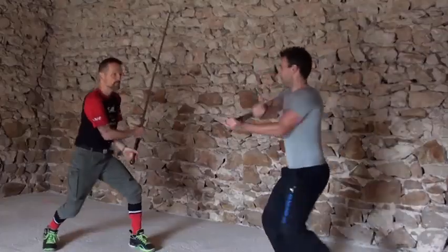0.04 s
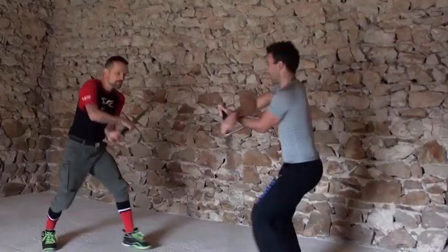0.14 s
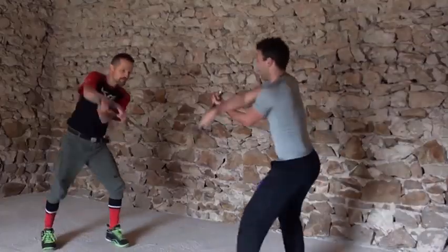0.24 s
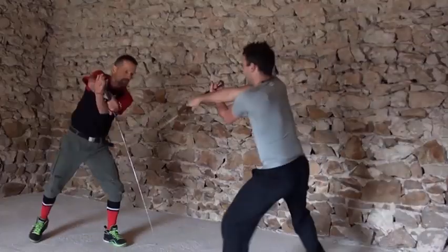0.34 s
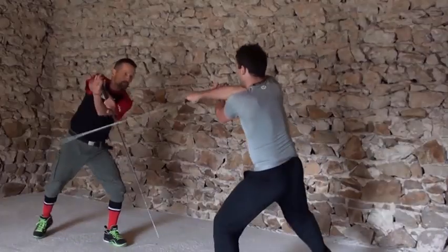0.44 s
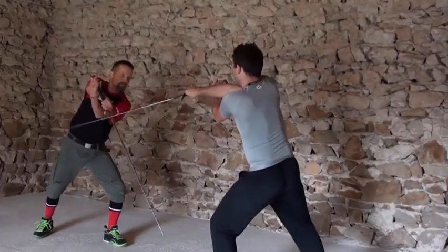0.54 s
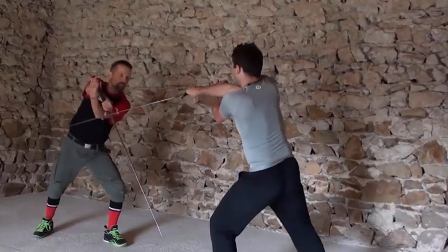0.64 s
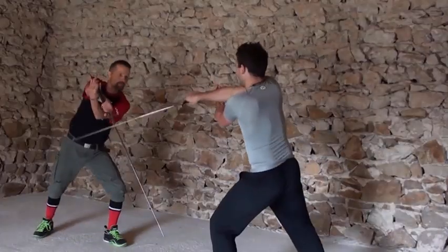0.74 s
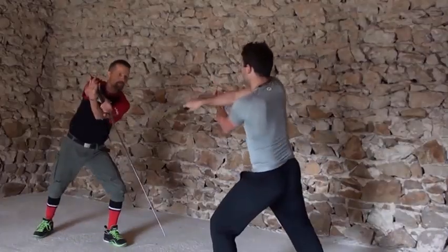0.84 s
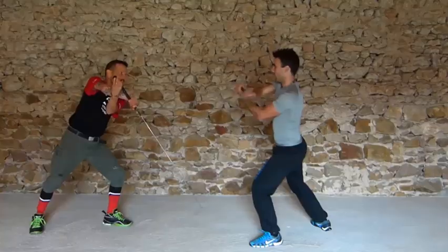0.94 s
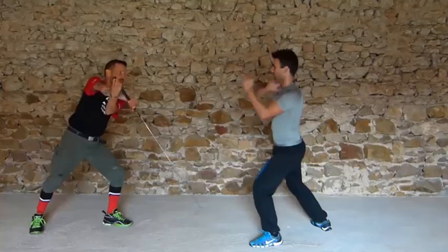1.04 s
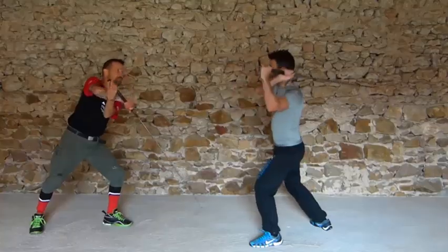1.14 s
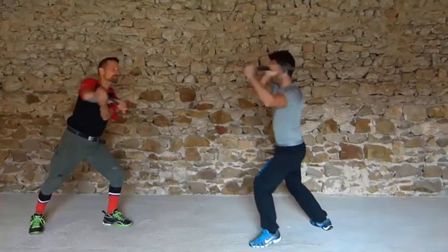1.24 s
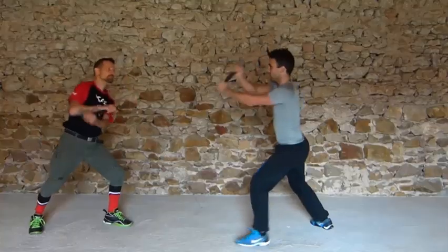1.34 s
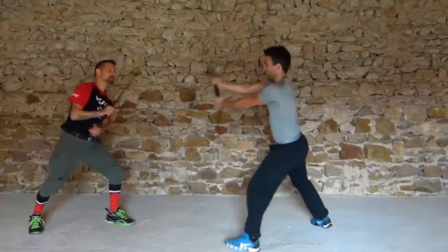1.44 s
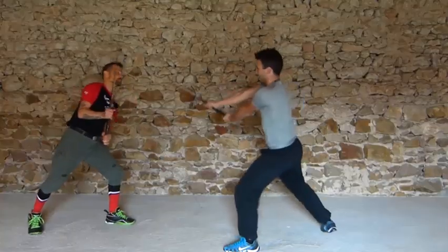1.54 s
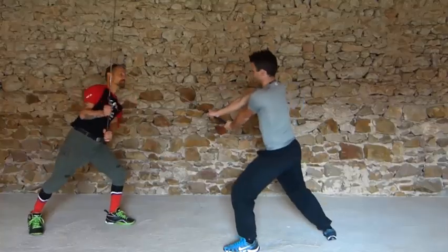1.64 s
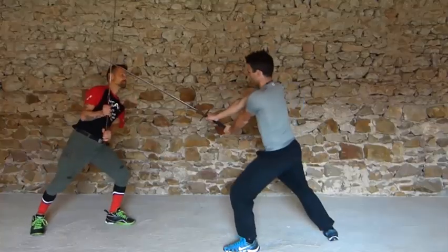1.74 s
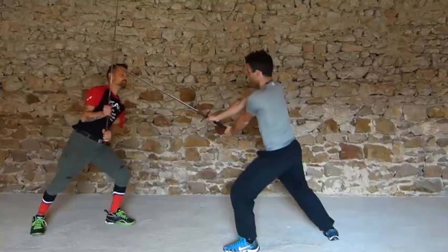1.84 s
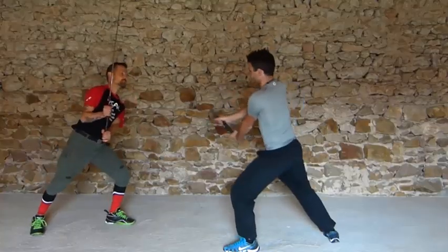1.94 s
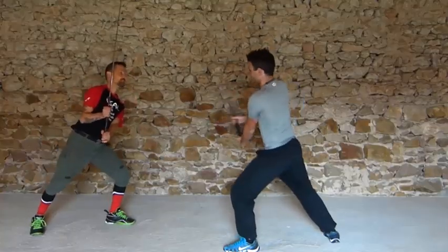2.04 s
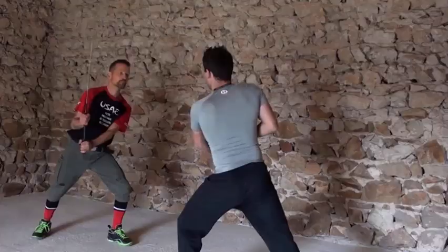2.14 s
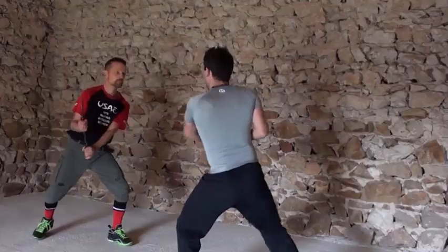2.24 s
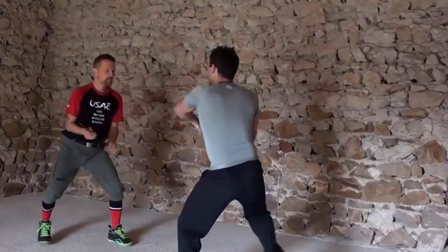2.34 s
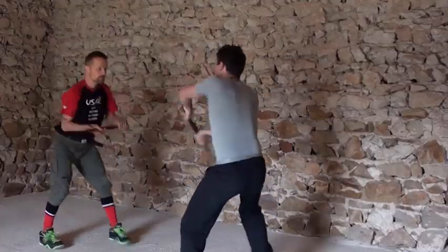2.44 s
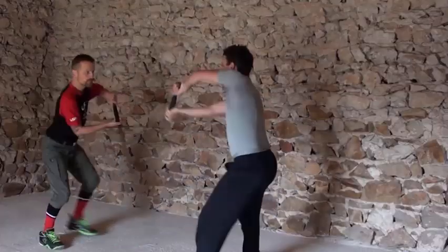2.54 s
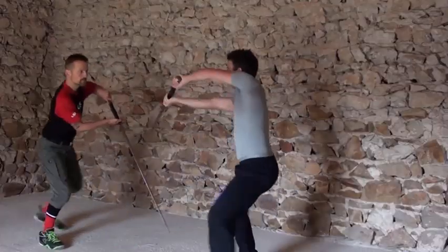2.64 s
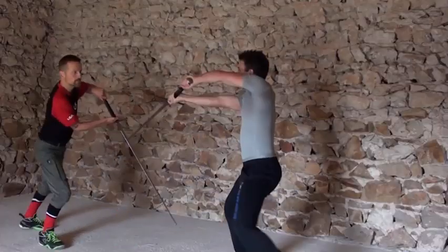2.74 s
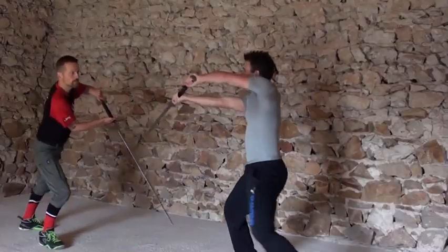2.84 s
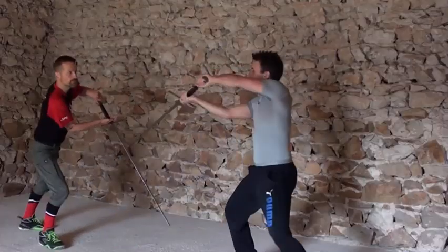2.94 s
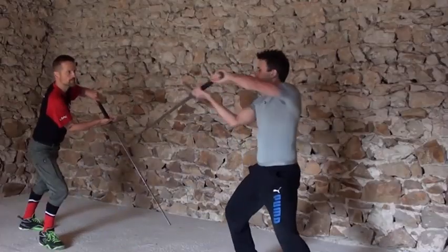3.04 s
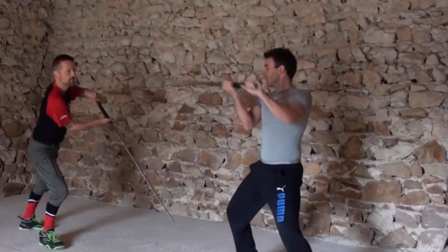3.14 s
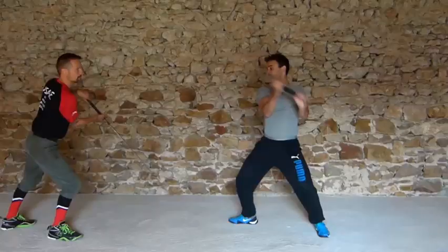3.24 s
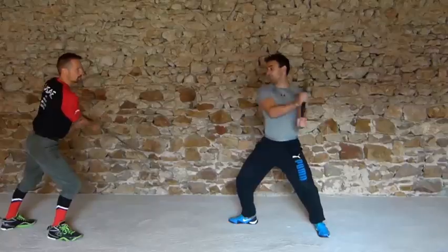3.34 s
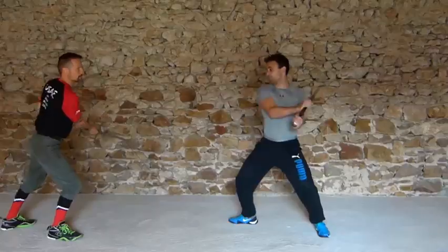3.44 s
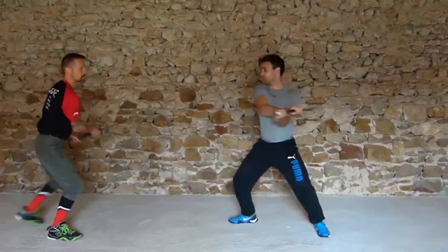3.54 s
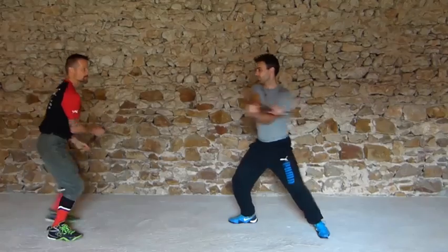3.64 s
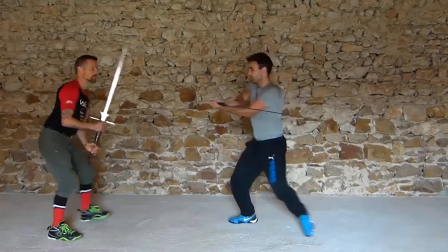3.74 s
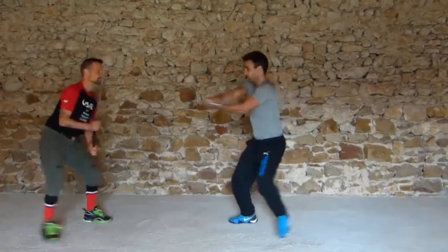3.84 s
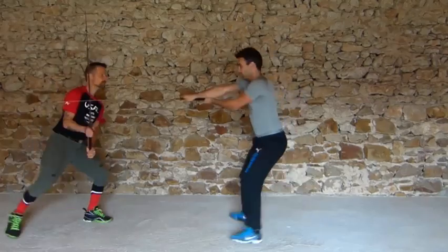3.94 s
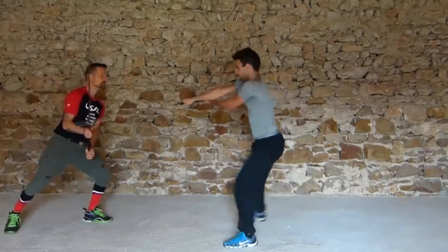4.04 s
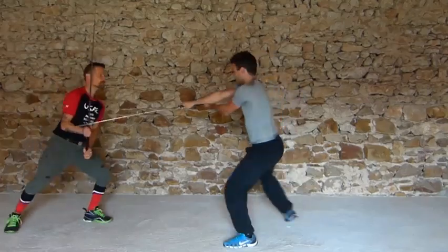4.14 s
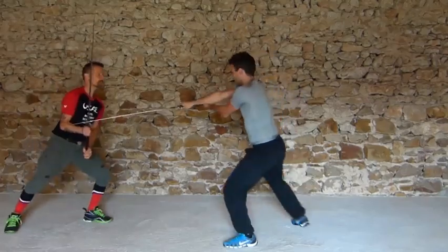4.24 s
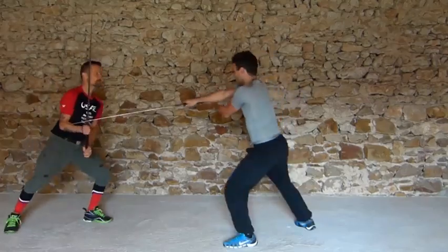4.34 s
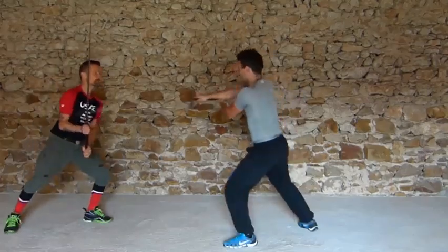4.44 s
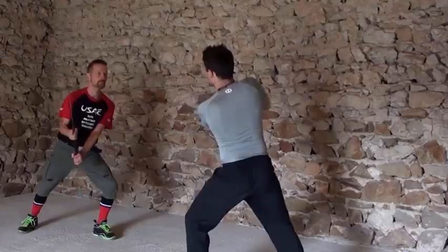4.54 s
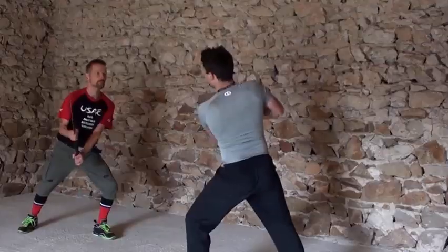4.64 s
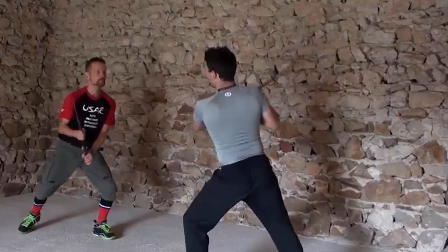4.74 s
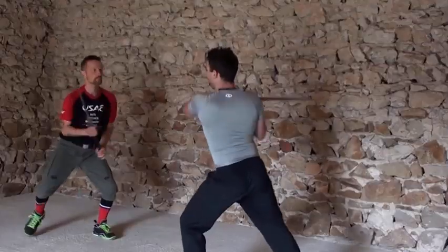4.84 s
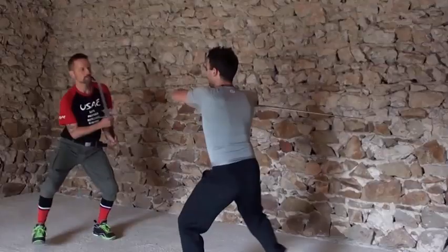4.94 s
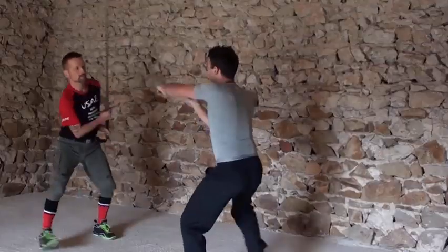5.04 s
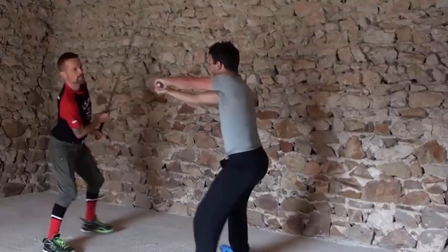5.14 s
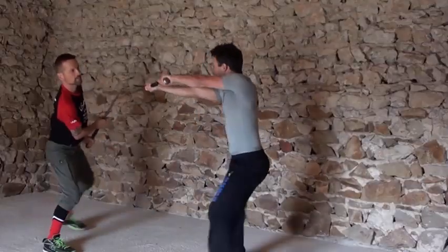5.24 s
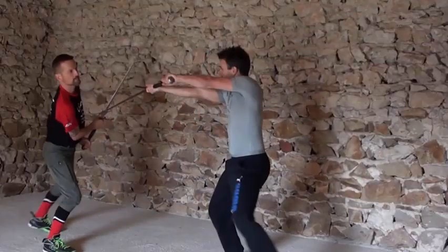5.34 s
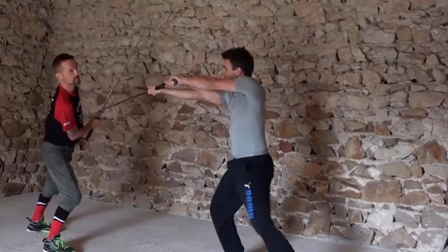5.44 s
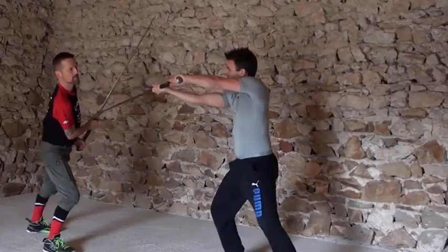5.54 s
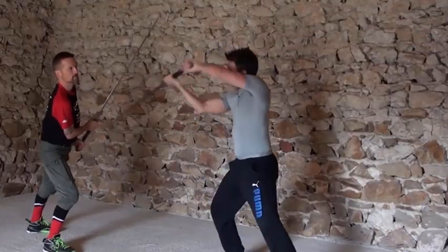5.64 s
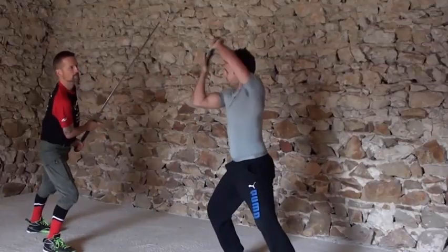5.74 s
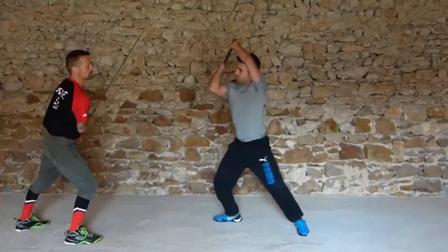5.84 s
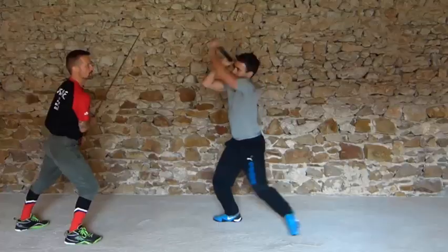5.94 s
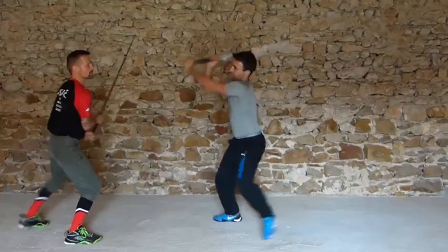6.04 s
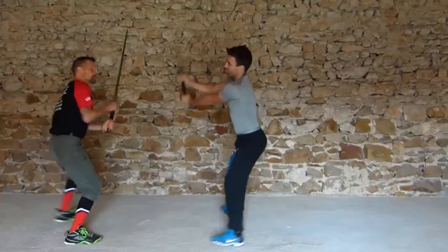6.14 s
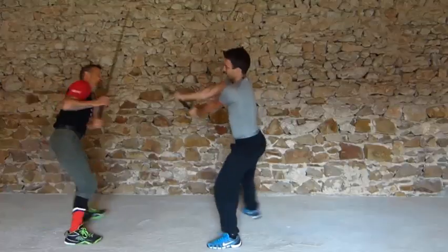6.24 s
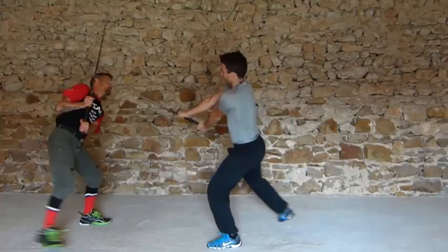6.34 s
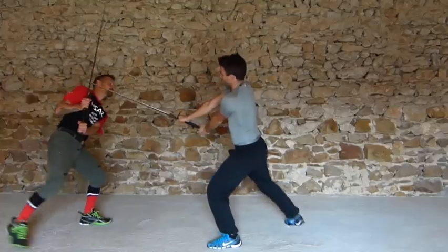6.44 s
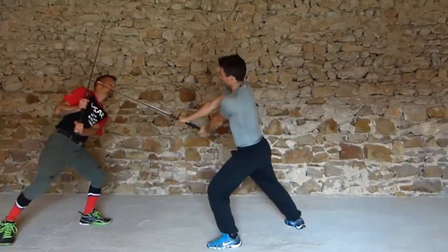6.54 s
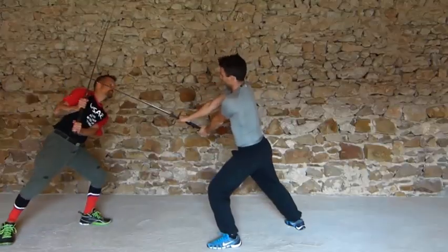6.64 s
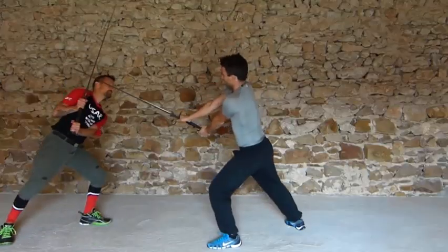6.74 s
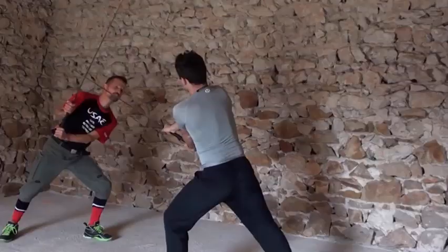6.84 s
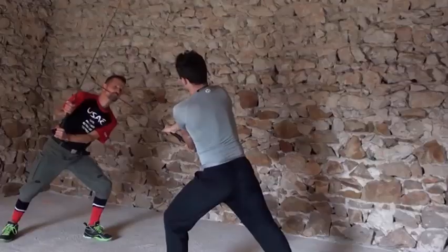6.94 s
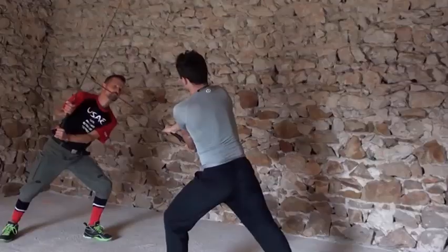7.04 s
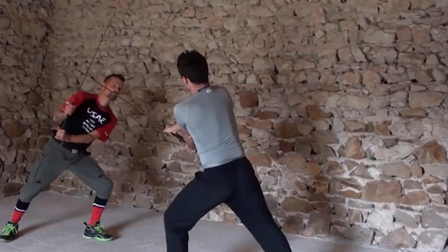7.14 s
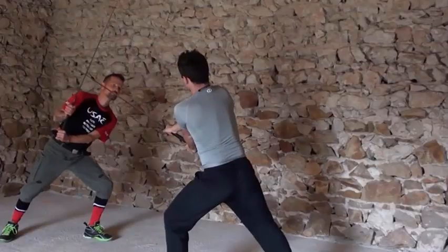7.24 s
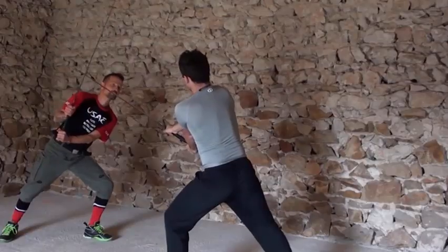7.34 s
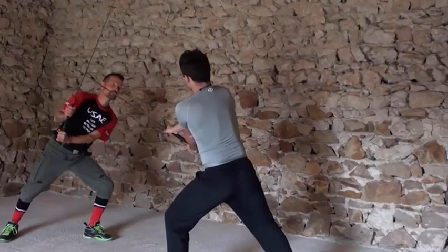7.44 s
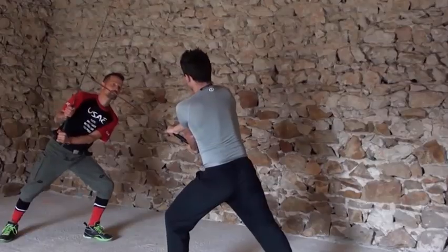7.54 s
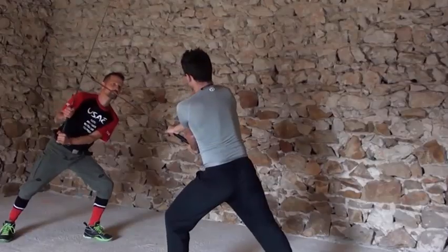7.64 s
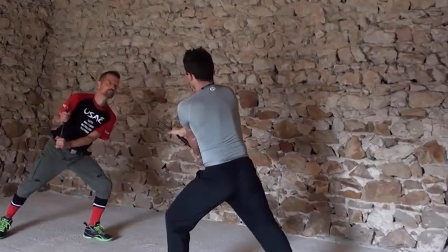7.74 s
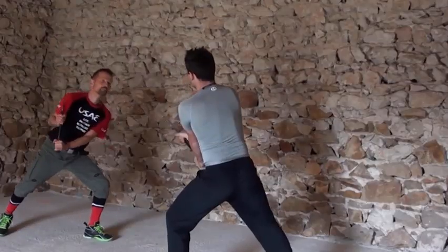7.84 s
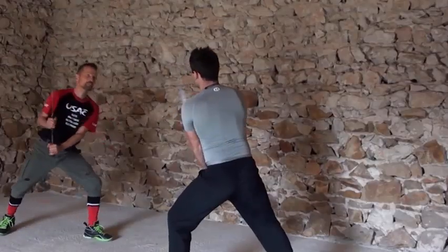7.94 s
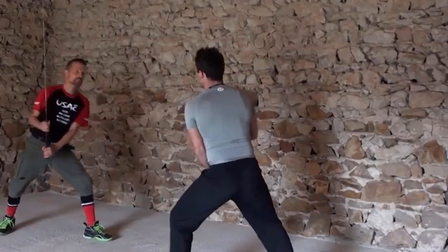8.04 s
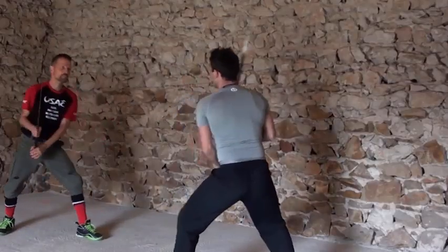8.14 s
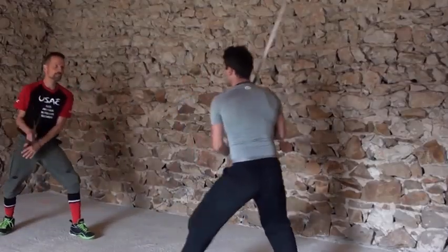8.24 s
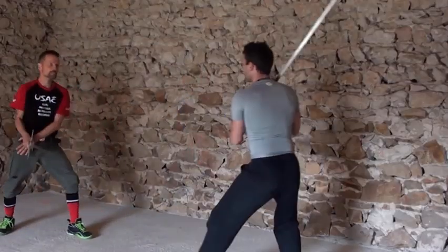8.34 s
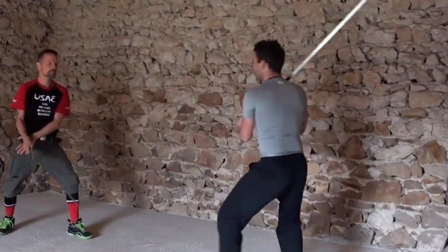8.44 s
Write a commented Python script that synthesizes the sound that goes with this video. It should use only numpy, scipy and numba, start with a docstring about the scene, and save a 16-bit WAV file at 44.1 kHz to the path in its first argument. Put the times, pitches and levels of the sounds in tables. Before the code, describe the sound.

A quiet room hush with short, hard stone-wall echo. A sole slides and stamps at 0.3 s, and at 0.35 s two steel blades crack together very loudly, rebounding at 0.52 s, with a clear high ring around 5 kHz lasting nearly a second. A lighter step leads to a slightly softer clash at 1.5 s and small tick at 1.67 s. Shuffling feet precede a hard, knocking clash at 2.56 s, answered by a strong second clack at 2.76 s. Another pair comes at 3.94 and 4.05 s with a stamp, then a faint touch at 4.37 s. A drier, quickly damped clash lands at 5.22 s, and a bright one at 6.24 s after a sleeve swish. From 6.7 to 7.5 s come only faint scraping ticks, then cloth rustle and a gritty foot slide near 8.1 s, fading into quiet.

```python
"""Steel longswords clash and ring as two fencers drill cuts and parries in a bare stone room.
Each clash is a rattle of filtered noise impacts, followed by decaying tones for the blades and crossguard.
Filtered noise also makes the sliding and stamping feet, the rustling clothes and the quiet background.
The room echoes clacks, feet and clothes; a fast limiter and a slow gain control hold down the peaks."""
import sys
import numpy as np
from scipy import signal
from scipy.fft import rfft, irfft
from scipy.io import wavfile
from numba import njit

SR = 44100
rng = np.random.default_rng(int(sys.argv[2]) if len(sys.argv) > 2 else 0)


def materialize(psi):
    """Save the field psi as 16-bit PCM at rate SR to the path in sys.argv[1].

    A 1-D psi becomes a single channel; in a 2-D psi each row is a channel.
    """
    bounded = np.clip(np.atleast_2d(psi).T, -1, 1)
    quanta = np.round(bounded * 32767).astype(np.int16)
    wavfile.write(sys.argv[1], SR, quanta)


N = 374409

# parried cuts: [start_s, clack_db, rattle_decay_ms, flat_knock_db, ring_damping_db_per_s, first_blade_ring_db,
#                second_blade_ring_db, swing_s, windup_rustle_db, release_swish_db]
PARRIED_CUTS = [ (0.349, 8.5, 5.9, 0.5, -4, 1, -26.5, 0.39, -56.5, -38),
                (1.504, 2.5, 9.7, -3.5, 28, -8, -11.5, 0.31, -50, -42),
                (2.564, 7.5, 6.5, 7.5, 25, 5.5, -23, 0.44, -54, -45.5),
                (3.935, 3, 7.3, -2, 22.5, -4, -29, 0.47, -47.5, -53),
                (5.222, -1, 10, -5, 46.5, -4.5, -6, .35, -59, -45.5),
                (6.244, 6, 6.6, -3.5, 18, -20, -2.5, .42, -59, -37.5)]
# steps, each a slide of the sole and a landing:
# [landing_s, stamp_db, slide_lead_s, slide_length_s, slide_db, slide_tilt_db_per_octave]
FOOTSTEPS = [ (0.301, -13, 0.18, 0.15, -22, 1.26), (0.877, -62, 0.019, 0.1, -51.5, -14),
             (1.430, -23.5, 0.043, 0.06, -43, -0.5), (2.435, -29, 0.013, 0.055, -38, 4.5),
             (2.530, -39, 0.016, 0.04, -47, -2), (3.747, -42, .018, 0.08, -38, 0),
             (3.972, -17.5, 0.087, 0.059, -38, 5), (4.324, -45, .025, 0.071, -32.5, 4.5),
             (5.199, -23.5, .165, 0.27, -44.5, -8), (6.122, -41, .005, 0.11, -39.5, -6),
             (7.680, -63, 0.041, 0.069, -44, -1), (8.136, -34.5, .066, 0.19, -31.5, 1.5)]


def undb(db):
    """Decibels to gain."""
    return 10 ** (np.asarray(db) / 20)


def unit(x):
    """Scale to unit energy."""
    return x / np.sqrt(np.sum(x ** 2))


def seconds(length):
    """Time axis of the given length."""
    return np.arange(int(length * SR)) / SR


def fade(t, t60):
    """Exponential decay by 60 dB in t60 seconds."""
    return np.exp(-np.log(1000) * t / t60)


def read(points, hz):
    """Read (pitch_hz, value) points on a log-frequency axis."""
    f, value = np.transpose(points)
    return np.interp(np.log(hz + 1), np.log(f), value)


def add(track, s, x):
    """Mix x into the track from time s, or from the very start if s is negative."""
    i = max(int(s * SR), 0)
    track[i:i + len(x)] += x[:N - i]


def colour(x, points, tilt=0, knock_db=0, knock_hz=2150, knock_width_hz=190, size=2048):
    """Minimum-phase filter of unit energy: a spectrum, a tilt in dB per octave and one resonance."""
    hz = np.arange(size // 2 + 1) * SR / size
    db = read(points, hz) + tilt * np.log2(1 + hz / 200)
    db += knock_db / (1 + ((hz - knock_hz) / knock_width_hz) ** 2)
    # folding the cepstrum makes the filter causal
    cepstrum = irfft(np.log(undb(db)))[:size // 2]
    cepstrum[1:] *= 2
    response = irfft(np.exp(rfft(cepstrum, size)))
    return signal.fftconvolve(x, unit(response))


def walk(rate):
    """Random wander with a spread near 1, heading for a new value rate times a second."""
    knots = rng.standard_normal(4096)
    return np.interp(np.arange(N) / SR * rate, np.arange(len(knots)), knots)


def blow(x, db):
    """Give a short sound the energy of 50 ms at this level."""
    return unit(x) * undb(db) * np.sqrt(SR / 20)


@njit
def follow(x, attack, release):
    """Envelope that rises at one rate and sinks at another."""
    out, e = np.empty(len(x)), 0.
    for i in range(len(x)):
        e += (x[i] - e) * (attack if x[i] > e else release)
        out[i] = e
    return out


def air(level_db=-65, side_db=-12, wander_db=0.38):
    """The quiet background of the room, filtered noise of slightly wandering level; returns mid and side."""
    # spectrum of the background: [pitch_hz, relative_db]
    air_spectrum = [(30, -23), (100, -18), (200, -0.5), (350, -2.5), (700, -12), (1400, -21.5), (4000, -16),
                    (8000, -22.5), (16000, -26.5)]
    mid, side = (colour(rng.standard_normal(N), air_spectrum)[:N] for _ in range(2))
    return undb(level_db + wander_db * walk(5)) * np.array([mid, undb(side_db) * side])


def stone_room(x, early_db=-9, side_db=-12.5, build_s=0.0038, echo_db=-5.5):
    """A few hard reflections and the dense echo of rough walls; returns mid and side."""
    # reverberation of the stone room: [pitch_hz, t60_s]
    room_decay = [(100, 0.51), (500, 0.69), (2000, 0.52), (5000, 0.47), (9000, 0.29), (15000, 0.16)]
    # first reflections from floor and walls: [delay_ms, relative_db]
    first_reflections = [(5.6, -5.5), (9.3, -2.5), (14.6, -7), (19.8, -14)]
    t = seconds(1)
    hz = np.arange(len(t) // 2 + 1) * SR / len(t)
    centres = np.geomspace(60, 16000, 12)
    noise, tail = rfft(rng.standard_normal((2, len(t)))), 0
    # overlapping bands of noise, each with its own decay
    for centre, band in zip(centres, np.eye(len(centres))):
        band_noise = irfft(noise * read(np.c_[centres, band], hz))
        tail = tail + band_noise * fade(t, read(room_decay, centre))
    mid, side = (unit(v * (1 - np.exp(-t / build_s))) for v in tail)
    for ms, db in first_reflections:
        mid[int(ms * SR / 1000)] += undb(early_db + db)
    echoes = [signal.fftconvolve(x, h)[:N] for h in (mid, undb(side_db) * side)]
    return np.array(echoes) * undb(echo_db)


def rub(length, grain_db, catch_db=3, catch_rate=70):
    """One stroke of friction: a dense run of uneven slips that swells, catches here and there and dies."""
    t = seconds(length)
    force, size, catches = rng.standard_normal((3, len(t)))
    grip_db = grain_db * size + catch_db * np.interp(t * catch_rate, np.arange(len(t)), catches)
    stroke = np.abs(np.sin(np.pi * t / t[-1])) ** 0.6
    return unit(force * undb(grip_db) * stroke) * np.sqrt(len(t))


def rustles(release_share=.42, swish_share=0.77):
    """Cloth rubs through the swing of every cut and as the fencers step back into guard."""
    # the fencers step back into guard: [start_s, length_s, level_db]
    recovery = [(7.55, 0.56, -53.5), (8.2, 0.19, -44.5)]
    # spectrum of rubbing cloth: [pitch_hz, relative_db]
    cloth_spectrum = [(100, -5), (500, 5.5), (2000, 1.5), (7000, -1), (11000, -10.5), (16000, -21)]
    out, strokes = np.zeros(N), list(recovery)
    for s, *_, swing, windup_db, swish_db in PARRIED_CUTS:
        # the arms wind up, then fly out for the last share of the swing; sleeves swish for most of that time
        release = release_share * swing
        strokes.append((s - swing, swing - release, windup_db))
        strokes.append((s - release, swish_share * release, swish_db))
    for s, length, db in strokes:
        add(out, s, undb(db) * colour(rub(length, grain_db=7.5), cloth_spectrum))
    return out


def scuffs():
    """Soles slide over gritty concrete: coarse friction around every landing."""
    # spectrum of a sole on grit: [pitch_hz, relative_db]
    scuff_spectrum = [(40, -27.5), (150, -23), (320, -4.5), (600, 4), (1200, -3), (2000, -0.5), (3500, -13),
                      (8000, -18), (16000, -40.5)]
    out = np.zeros(N)
    for s, _, lead, length, db, tilt in FOOTSTEPS:
        add(out, s - lead, undb(db) * colour(rub(length, grain_db=8.0), scuff_spectrum, tilt))
    return out


def stamps(settle_db=1, settle_s=0.02, soft_db=-40.5, soft_tilt_db=-1.5, brighter_per_db=0.19):
    """A sole slaps the concrete, then the rest of the foot settles; harder landings are brighter."""
    # spectrum of a landing foot: [pitch_hz, relative_db]
    stamp_spectrum = [(30, -21.5), (90, -10), (200, 3), (600, 2.5), (1200, -0.5), (2200, -3), (4000, -19),
                      (8000, -36.5), (16000, -56.5)]
    out, t = np.zeros(N), seconds(.15)
    for s, db, *_ in FOOTSTEPS:
        tilt = soft_tilt_db + brighter_per_db * max(db - soft_db, 0)
        force = undb(settle_db) * unit(rng.standard_normal(len(t)) * np.exp(-t / settle_s))
        force[0] += 1  # the slap
        add(out, s, blow(colour(force, stamp_spectrum, tilt), db))
    return out


def contacts():
    """Every meeting of the steel, where softer touches sound duller.

    Rows: (start_s, clack_db, rattle_decay_ms, tilt, knock_db, damping_db_per_s, ring_db of each part)."""
    # rebounds and light touches as the swords part:
    # [start_s, clack_db, rattle_decay_ms, names of the parts that ring most, their ring_db]
    light_touches = [ (0.000, -54.5, 18, "first", -47), (0.524, -4.5, 6.4, "first", -12.5),
                     (1.028, -49, 13, "first", -54), (1.405, -39, 2.8, "first", -69.5),
                     (1.672, -14.5, 3.9, "first", -34), (2.098, -46, 11.6, "first", -70.5),
                     (2.219, -53, 1.1, "guard", -80), (2.757, -3.5, 13, "second", -26),
                     (3.188, -44.5, 2.8, "first", -71), (3.379, -44, 10, "first", -69),
                     (3.682, -46, 1.7, "second guard", -61), (4.046, -7, 7.5, "first", -31),
                     (4.365, -22, 5, "first second", -27.5), (4.624, -33.5, 38, "first", -54.5),
                     (4.762, -39, 24, "first", -45), (5.025, -55, 17, "first second", -61),
                     (5.170, -42, 1.5, "guard", -71), (5.589, -72, 22, "first second", -38),
                     (6.027, -47, 13, "first", -74), (6.705, -33.5, 28, "guard", -45.5),
                     (6.797, -38.5, 12, "first second", -39), (6.886, -43.5, 4.3, "guard", -44),
                     (7.110, -45, 4.6, "second guard", -50.5), (7.494, -43.5, 10, "guard", -35.5)]
    cut_tilt_db, guard_db = 1, -29  # tilt per octave; ring of the crossguard relative to the clack
    # every touch: extra knock, damping (negative: it rings on longer), level of the parts not struck
    touch_knock_db, touch_damping_db_per_s, other_parts_db = 2, -2.5, -22
    # below a firm blow, the tilt per octave falls with each dB of force lost
    firm_db, firm_tilt_db, dulling_per_db = -18.5, 1.5, 0.32
    rows = []
    for s, db, rattle_ms, knock_db, damping, first_db, second_db, *_ in PARRIED_CUTS:
        rings = {"first": first_db, "second": second_db, "guard": db + guard_db}
        rows.append((s, db, rattle_ms, cut_tilt_db, knock_db, damping, rings))
    for s, db, rattle_ms, struck, ring_db in light_touches:
        rings = {part: ring_db + other_parts_db * (part not in struck)
                 for part in ("first", "second", "guard")}
        tilt = firm_tilt_db - dulling_per_db * max(firm_db - db, 0)
        # the blades stay turned as they met in the last cut, so the flat knocks as it did then
        earlier_knocks = [cut[3] for cut in PARRIED_CUTS if cut[0] < s] or [0]
        knock_db = touch_knock_db + earlier_knocks[-1]
        rows.append((s, db, rattle_ms, tilt, knock_db, touch_damping_db_per_s, rings))
    return rows


def clacks(shimmer_t60=0.28, grain_db=7, hardness=.55, bite_s=0.0011, full_rattle_ms=8, patchy_db=0.34,
           light_patchy_db=3, light_dull_db=-10, lightest_db=-45, thin_hz=900, light_thin_db=-8):
    """The edges chatter against each other for some ms; the tiny impacts crack and shake the blades."""
    # spectrum of steel on steel: [pitch_hz, relative_db]
    clack_spectrum = [(70, -45), (200, -24), (450, -18.5), (1200, -11), (2500, -5), (4200, -1.5),
                      (6500, 3.5), (8500, -1.5), (10500, -7), (13000, -18), (16000, -23)]
    out, t = np.zeros(N), seconds(.4)
    hz = np.linspace(2500, 15000, 36)
    top = np.clip((hz - 9000) / 4000, 0, 1)
    for s, db, rattle_ms, tilt, knock_db, *_ in contacts():
        force, size, crowd = rng.standard_normal((3, len(t)))
        impacts = force * undb(grain_db * size) * np.exp(-t * 1000 / rattle_ms)
        # hard edges crack brighter than the blades answer
        chatter = unit(signal.lfilter([1, -hardness], 1, impacts))
        # the short-lived bending and twisting modes lie so close that they blur into a hiss
        shimmer = unit(crowd * fade(t, shimmer_t60))
        # a brief tick hardly shakes the blades; a long scrape takes a while to bite
        share = rattle_ms / full_rattle_ms
        bite = 1 - np.exp(-t / (bite_s * share ** 2))
        steel = (chatter + min(share, 1) * shimmer) * bite
        # every spot along the edge favours other bands; a light touch is patchier and has less treble
        light = np.clip(db / lightest_db, 0, 1)
        spot = (patchy_db + light * light_patchy_db) * rng.standard_normal(len(hz))
        spot += light * light_dull_db * top
        # a light touch is too weak to move the whole blade, so it lacks body
        body = [(thin_hz, light * light_thin_db)]
        struck = colour(steel, np.r_[body, np.c_[hz, spot]])
        add(out, s, blow(colour(struck, clack_spectrum, tilt, knock_db), db))
    return out


def ring(modes, part, scatter_db=-1.0, waver=0.53, waver_rate=70, swell_s=.028, soft_tilt_db=-13,
         softest_db=-65):
    """Long-lived modes swell after each contact and waver as the blade flexes and swings."""
    out, t, hits = np.zeros(N), seconds(1.6), contacts()
    # hands and the other blade set the damping of each ring
    swell = 1 - np.exp(-t / swell_s)
    holds = [undb(rings[part] - damping * t) * swell for *_, damping, rings in hits]
    for hz, db, t60 in modes:
        tone, mode = np.exp(2j * np.pi * hz * t) * fade(t, t60), np.zeros(N, complex)
        octaves = np.log2(max(hz, 3700) / 5200)
        draws = rng.standard_normal((len(hits), 2))
        for (s, clack_db, *_), hold, (size, turn) in zip(hits, holds, draws):
            # where the blade is struck decides how much each mode takes; a soft touch favours lower ones
            softness = np.clip(clack_db / softest_db, 0, 1) ** 2
            share_db = scatter_db * size + soft_tilt_db * octaves * softness
            add(mode, s, tone * hold * (undb(db + share_db) * np.exp(1j * np.pi * turn)))
        out += np.real(mode * (1 + waver * (walk(waver_rate) + 1j * walk(waver_rate))))
    return out


def scene(steel_direct_db=-7, feet_direct_db=-5):
    """Blades, feet and clothes mixed direct and through the room into a narrow stereo image."""
    # modes of the steel, before the damping of each contact: [pitch_hz, level_db, t60_s]
    first_blade = [(5247, -9, .95), (5270, 0, .9), (5288, -4, .8), (5338, -10, .9), (5777, -11, .7),
                   (6640, -14, .55), (8505, -14, .4), (9802, -15, .4)]
    second_blade = [(4881, -2, .85), (5360, 0, .72), (5683, -9, .5), (6142, -7, .5), (6204, -5, .5),
                    (7143, -6, .5), (8461, -5, .45), (8684, -8, .45), (9381, -9, .45), (910, -28, 1.2),
                    (2945, -33, 1.1), (3765, -27, 1.6), (7690, -12, .4), (10520, -17, .4)]
    crossguard = [(4550, -10.5, 0.91), (4480, -7, .45), (6611, -6, 0.31), (7540, -11, .5)]
    steel = clacks()
    bodies = stamps() + scuffs() + rustles()
    rings = ring(first_blade, "first") + ring(second_blade, "second") + ring(crossguard, "guard")
    mid, side = stone_room(steel + bodies) + air()
    mid = mid + undb(steel_direct_db) * steel + undb(feet_direct_db) * bodies + rings
    # the ringing drifts between left and right as the blades move
    side = side + .2 * walk(60) * rings
    return np.array([mid + side, mid - side])


def limit(x, top_db, attack_s, release_s, slope):
    """Turn both channels down by a share (slope) of the dB by which their envelope exceeds the top."""
    envelope = follow(np.abs(x).max(axis=0), 1 / (1 + attack_s * SR), 1 / (1 + release_s * SR))
    return x * np.maximum(envelope / undb(top_db), 1) ** -slope


def record(dry):
    """A fast limiter, a gentle slow gain control, rounded peaks, a bass cut and a cut top."""
    held = limit(dry, top_db=-4.0, attack_s=0.000093, release_s=0.041, slope=0.91)
    held = limit(held, top_db=-26, attack_s=0.0059, release_s=0.97, slope=0.11)
    ceiling = undb(-5.0)
    rounded = ceiling * np.tanh(held / ceiling)
    bass_cut = signal.butter(2, 75, "high", fs=SR, output="sos")
    top_cut = signal.ellip(8, .2, 70, 15900, fs=SR, output="sos")
    return signal.sosfilt(top_cut, signal.sosfilt(bass_cut, rounded))


dry = scene()
out = record(dry)
materialize(out)
```